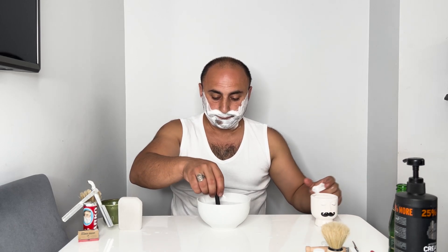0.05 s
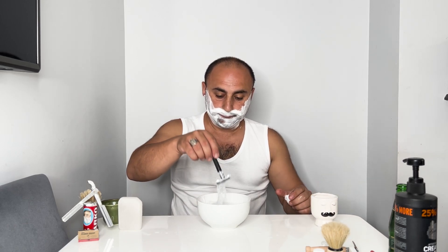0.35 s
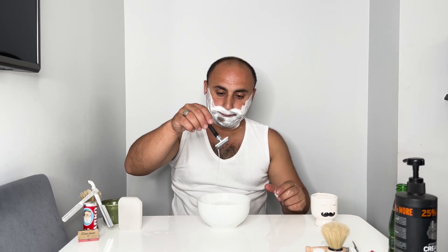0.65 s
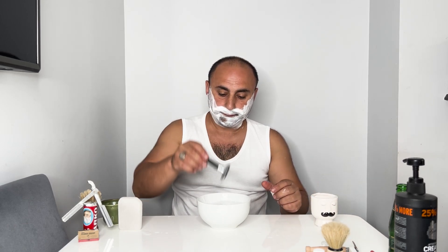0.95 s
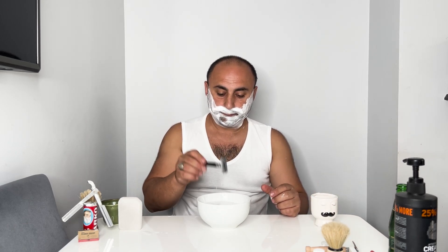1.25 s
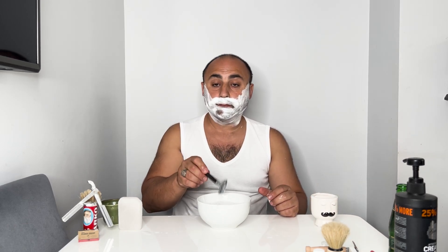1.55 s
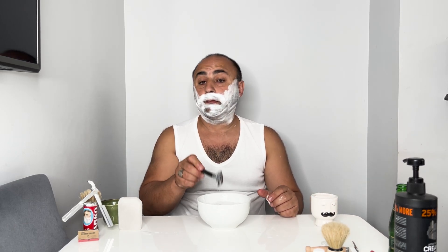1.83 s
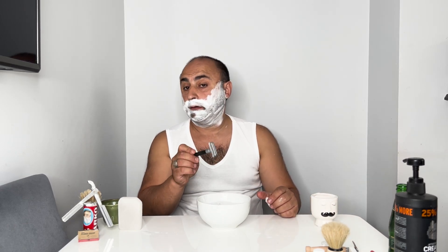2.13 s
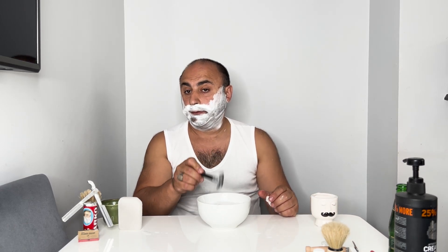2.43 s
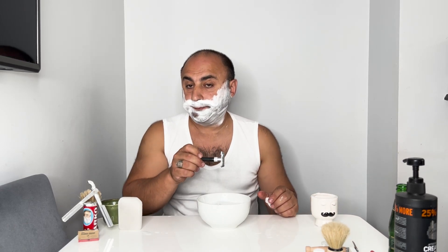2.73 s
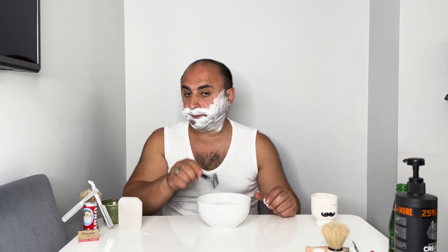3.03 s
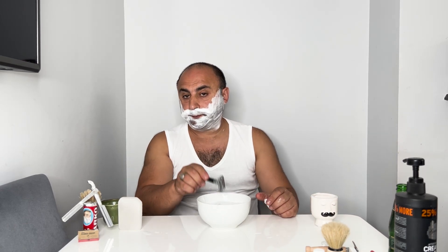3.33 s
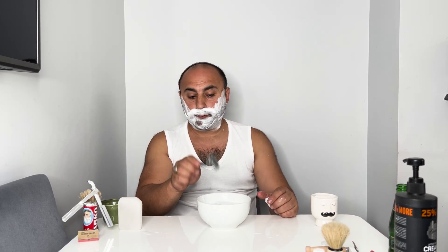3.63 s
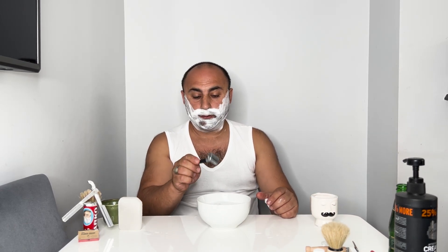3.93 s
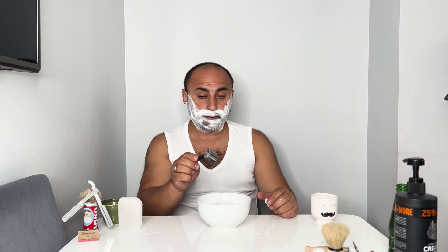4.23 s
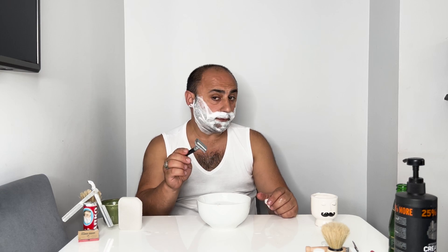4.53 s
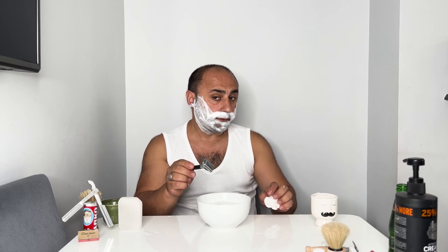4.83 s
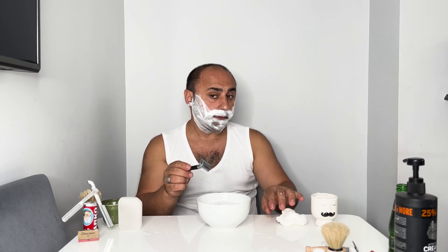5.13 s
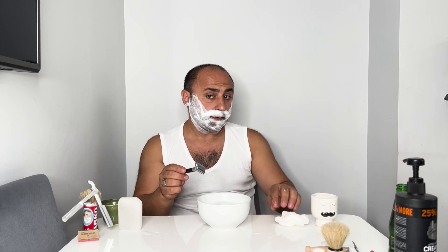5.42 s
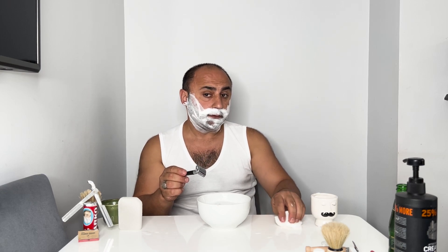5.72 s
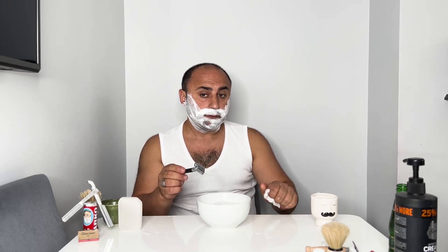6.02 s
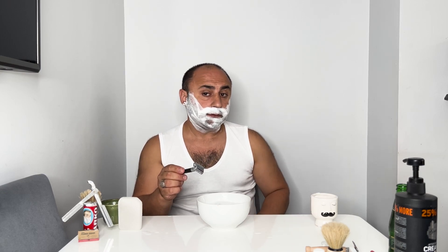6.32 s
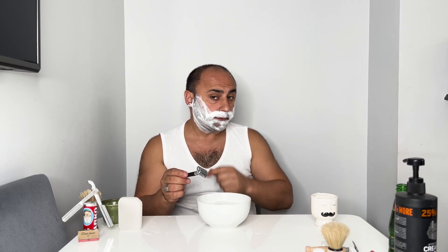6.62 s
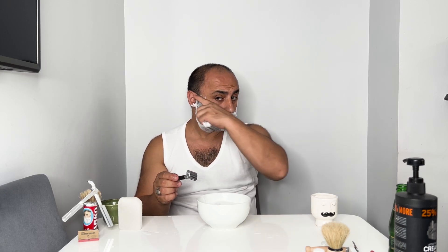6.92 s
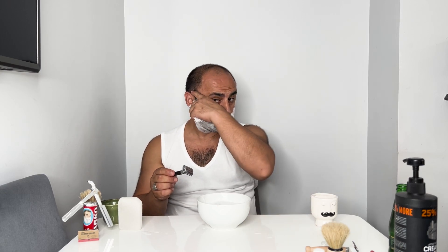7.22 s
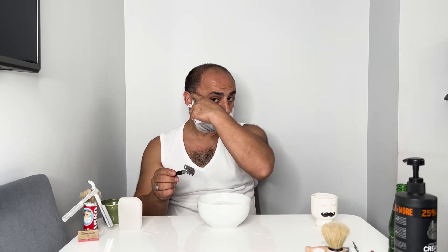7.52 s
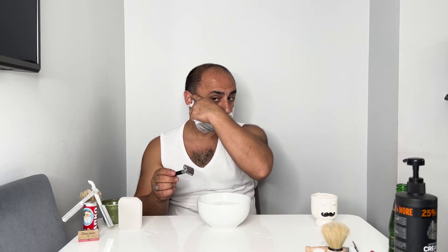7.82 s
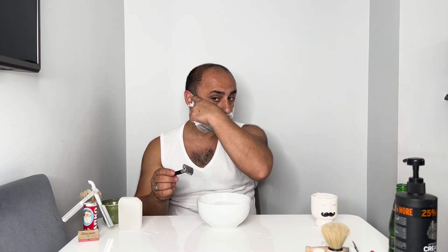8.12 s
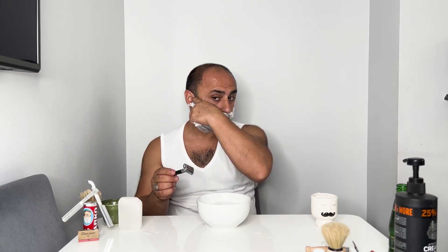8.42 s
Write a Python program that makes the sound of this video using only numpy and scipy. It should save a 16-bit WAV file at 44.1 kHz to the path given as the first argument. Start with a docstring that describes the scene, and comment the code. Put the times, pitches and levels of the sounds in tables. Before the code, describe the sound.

A few bubbly plops and a light china clink give way to thinning drips as a razor comes out of a bowl of water. Quick wet, rattling flicks follow, with deep thuds from the jolted table. After a hollow knock, quiet tissue scrapes and crinkles trail off under a faint low hum. Everything is heard from close by in a small, slightly echoing room, over steady hiss and the soft rumble of moving arms.

```python
"""Water plops as a safety razor is lifted from a china bowl in a small bare room. Each drop traps a
ringing bubble; the razor clinks on the china, dribbles and drips. It is then shaken hard, rattling and
flinging spray while the forearm jolts the table. A hand knocks the table and slides a tissue over it,
and a low hum swells and fades. Arm movements rumble softly over the room's steady hiss."""
import sys
import numpy as np
from scipy import signal
from scipy.fft import rfft, irfft, next_fast_len
from scipy.io import wavfile
from scipy.ndimage import uniform_filter1d

SR = 44100
rng = np.random.default_rng(int(sys.argv[2]) if len(sys.argv) > 2 else 0)


def wrap_up_sound(samples):
    """Save the sound to the file named by the first command line argument, as 16-bit audio."""
    columns = np.atleast_2d(samples).T
    # keep every value between -1 and 1, then stretch to whole-number steps
    tamed = np.clip(columns, -1, 1)
    steps = np.round(tamed * 32767).astype(np.int16)
    wavfile.write(sys.argv[1], SR, steps)


N = 373086

# Plops and drips in the bowl. A ring time, or t60, is how long a sound takes to fade by 60 dB.
# (time [s], level [dB], pitch [Hz], ring time [s], relative splash level [dB])
WATER_DROPS = [(0.09, -27.5, 920, 0.0041, -23), (0.094, -29, 500, 0.01, -17), (.119, -32.5, 402, 0.028, -8),
               (0.277, -49.5, 1200, 0.014, -25), (0.282, -51.5, 1780, 0.016, -38),
               (.345, -44.5, 1310, 0.0078, -10.5), (0.371, -48, 1004, 0.015, -2),
               (0.51, -56.5, 1170, 0.053, -1), (.535, -32, 840, 0.0087, -21),
               (0.54, -53.5, 1120, 0.044, -7), (0.554, -55.5, 1820, 0.033, -13),
               (0.609, -50.5, 1210, 0.055, -14), (.630, -36.5, 1170, 0.025, -6.5),
               (0.6306, -39, 1833, 0.032, -17), (.648, -43, 1904, 0.023, -0.5),
               (.655, -47.5, 1195, 0.046, -18), (0.938, -45.5, 1302, 0.054, -29),
               (0.939, -38.5, 1637, 0.015, -10), (0.989, -55, 2850, 0.0098, 5), (1.085, -55, 2400, .01, 4),
               (1.39, -56.5, 2640, 0.0085, -2.5), (1.832, -59.5, 3530, 0.012, -0.5),
               (2.056, -61.5, 3550, 0.016, 4.5), (2.174, -51, 520, 0.012, -6.5),
               (3.552, -57, 330, 0.084, 1), (3.717, -56.5, 1340, 0.029, -3)]
# Flicks of the razor: (time [s], spray level [dB], swell time [s], slap level [dB], rattle level [dB])
RAZOR_FLICKS = [(2.222, -55, 0.018, -64, -63.5), (2.387, -42.5, 0.011, -43.5, -41),
                (2.554, -57.5, 0.011, -47, -53), (2.586, -47.5, 0.013, -51, -47),
                (2.732, -46, 0.02, -46.5, -50.5), (2.842, -53.5, 0.011, -43, -52),
                (2.977, -63.5, 0.017, -50.5, -59), (2.992, -44.5, 0.029, -44.5, -51),
                (3.135, -63.5, 0.016, -60, -71), (3.237, -49.5, 0.011, -52.5, -51)]
# The tone of fizzing water and lather: (frequency [Hz], level [dB])
FIZZ_SPECTRUM = [(300, 12), (1000, -9), (2500, 2.5), (5000, -9.5), (9000, -1), (15000, -17.5)]


def amp(db):
    """Turn decibels into a factor to multiply by."""
    return 10 ** (np.asarray(db) / 20)


def unit(x):
    """Scale a sound to an average strength (rms) of 1."""
    return x / np.sqrt(np.mean(x ** 2) + 1e-20)


def along(points, hz):
    """Read a curve of (frequency [Hz], value) points at hz, on a logarithmic frequency axis."""
    frequencies, values = np.transpose(points)
    return np.interp(np.log(hz + 1), np.log(frequencies + 1), values)


def filtered(x, response):
    """Multiply each frequency in x by response(hz)."""
    length = x.shape[-1]
    padded = next_fast_len(length + 8192)
    return irfft(rfft(x, padded) * response(np.fft.rfftfreq(padded, 1 / SR)), padded)[..., :length]


def coloured(x, spectrum, peaks=()):
    """Give x a broad tone with narrow peaks on top, at strength 1."""
    lift = lambda hz: sum(db / (1 + (2 * (hz - centre) / width) ** 2) for centre, width, db in peaks)
    return unit(filtered(x, lambda hz: amp(along(spectrum, hz) + lift(hz))))


def grains(size, per_s, spread_db):
    """Tiny random impacts of uneven strength."""
    hits = rng.random(size) < per_s / SR
    return hits * rng.standard_normal(size) * amp(spread_db * rng.standard_normal(size))


def moment():
    """Half a second of sample times, for one short event."""
    return np.arange(SR // 2) / SR


def fade(t, t60):
    """A smooth dying away, 60 dB down at t60."""
    return np.exp(-np.log(1000) * t / t60)


def bell_curve(offset, width):
    """A smooth hill, highest where offset is 0."""
    return np.exp(-.5 * (offset / width) ** 2)


def held(start, length, attack_s, t60):
    """A loudness curve that rises from start, holds until length is over, then dies away."""
    t = np.arange(N) / SR - start
    return np.clip(t / attack_s, 0, 1) * fade(np.maximum(t - length, 0), t60)


def ringing(tones, t):
    """The fading tones of a struck object, added together."""
    return sum(amp(db) * np.sin(2 * np.pi * hz * t) * fade(t, t60) for hz, db, t60 in tones)


def add(track, start_s, sound):
    """Mix a stereo sound into the track."""
    start = max(round(start_s * SR), 0)
    track[:, start:start + sound.shape[1]] += sound[:, :N - start]


def in_room(x, echo_db, early_db=3, early_t60=0.48):
    """The direct sound, then on each side quick echoes from table and walls and a blurred tail."""
    # How long the room echoes: (frequency [Hz], ring time [s])
    ring_times = [(100, 0.56), (400, 0.54), (1500, 0.49), (5000, 0.6), (9000, 0.52), (15000, 0.37)]
    hz, t, bands = signal.stft(rng.standard_normal((2, SR * 5 // 8)), SR, nperseg=256)
    tail = signal.istft(bands * fade(t, along(ring_times, hz)[:, None]), SR, nperseg=256)[1]
    t = np.arange(tail.shape[1]) / SR
    tail = tail * (1 + amp(early_db) * fade(t, early_t60)) * (t > .003)
    echoes = amp(echo_db) * tail / np.linalg.norm(tail[0])
    echoes[:, 0] = 1  # the direct sound
    return signal.fftconvolve(x[None], echoes, axes=1)[:, :N]


def hiss():
    """Steady room air, its upper part a little stronger on the left."""
    # The tone of the air: (frequency [Hz], level [dB])
    air_spectrum = [(100, 2), (300, -0.5), (500, -5.5), (900, -11), (1450, -12.5), (1750, -6.5),
                    (2050, -16.5), (3500, -21), (6500, -20.5), (8800, -21), (10500, -24.5), (15500, -62)]
    # The air's balance: (frequency [Hz], left over right [dB])
    balance = [(1000, 0.53), (1700, 8), (3000, 4), (6000, 1)]
    air = amp(-76) * coloured(rng.standard_normal((2, N)), air_spectrum)
    return filtered(air, lambda hz: amp(np.outer([.5, -.5], along(balance, hz))))


def rumble(arm_lag_s=0.067, arm_half_s=0.051):
    """Each body move and each shake sways table and chair in a smooth swell, and shifts the clothes."""
    # Leaning and arm moves: (middle [s], half-length [s], sway level [dB], cloth level [dB])
    moves = [(0.128, 0.21, -60, -61), (2.04, 0.059, -58.5, -80.5), (2.683, 0.062, -56.5, -50.5),
             (3.877, 0.26, -64, -67), (4.504, .1, -62, -89), (4.84, 0.1, -56.5, -90),
             (5.34, 0.077, -53, -73), (5.81, 0.63, -61, -74), (7.088, 0.45, -58.5, -69),
             (8.153, 0.18, -65, -89)]
    # The tones of swaying furniture and shifting cloth: (frequency [Hz], level [dB])
    sway_spectrum = [(20, -20.5), (33, -8.5), (44, 10), (57, 4.5), (70, 4.5), (88, -11), (130, -12),
                     (300, -74.5)]
    cloth_spectrum = [(70, -14.5), (110, 3), (170, -2.5), (280, -12.5), (500, -21.5), (1500, -58)]
    t = np.arange(N) / SR
    follow_throughs = [(s + arm_lag_s, arm_half_s, db - 21, db - 4) for s, db, *_ in RAZOR_FLICKS]
    sway_power, cloth_power = sum(np.outer(amp(levels) ** 2, np.exp(-((t - s) / half) ** 2))
                                  for s, half, *levels in moves + follow_throughs)
    # A faint rumble stays even while sitting still.
    sway = np.sqrt(sway_power + amp(-72) ** 2) * coloured(rng.standard_normal((2, N)), sway_spectrum)
    cloth = np.sqrt(cloth_power + amp(-78.5) ** 2) * coloured(rng.standard_normal((2, N)), cloth_spectrum)
    return amp(3.5) * (sway + cloth)


def taps():
    """Small noises with no ring: hard contacts peak at once, wet ones swell for a few milliseconds."""
    # Ticks and spits of razor, lather and fingers:
    # (time [s], level [dB], centre frequency [Hz], width [octaves], swell time [s])
    contacts = [(.026, -67.5, 3000, 1.1, 0.0018), (0.072, -61, 2960, 0.57, 0.0043),
                (0.0898, -41, 3100, 0.62, 0.00079), (.095, -54, 3980, 0.3, 0.0024),
                (.116, -44, 10200, 1.1, 0.00088), (0.371, -61.5, 2400, 0.79, 0.0058),
                (.448, -61.5, 6200, 0.5, 0.0044), (0.506, -57, 8060, 0.67, 0.0071),
                (0.534, -63, 4870, 0.33, .008), (0.762, -53.5, 9860, 0.24, 0.007),
                (0.84, -60, 4000, 2.8, 0.0024), (1.887, -50.5, 2890, 0.66, 0.00059),
                (1.888, -59, 10800, 0.73, 0.00082), (3.553, -56.5, 1590, 0.38, 0.0011),
                (3.694, -61, 8050, 0.4, 0.0017), (3.812, -60, 7500, 0.2, 0.0017),
                (4.039, -65, 8060, 0.34, .002), (4.667, -61, 2600, 0.48, 0.0013),
                (4.684, -58.5, 2340, 0.37, 0.0017)]
    out, t = np.zeros((2, N)), moment()
    for s, db, centre, width, swell in contacts:
        band = lambda hz: bell_curve(np.log2((hz + 1) / centre), width)
        noise = unit(filtered(rng.standard_normal(len(t)), band))
        loudness = t / swell * np.exp(1 - t / swell)
        add(out, s, in_room(amp(db - 5) * loudness * noise, echo_db=1.5))
    return out


def drops(glide=0.15, flutter=.03, bubble_rise_s=0.00036, splash_rise_s=0.0012, splash_t60=0.036):
    """Each drop slaps the water and traps a bubble that rings briefly, wavering and rising in pitch."""
    out, t = np.zeros((2, N)), moment()
    for s, db, hz, t60, splash_db in WATER_DROPS:
        waver = unit(uniform_filter1d(rng.standard_normal(len(t)), size=90))
        pitch = hz * (1 + glide * (.5 - fade(t, t60)) + flutter * waver)
        tone = np.sin(2 * np.pi * np.cumsum(pitch) / SR)
        bubble = tone * fade(t, t60) * (1 - np.exp(-t / bubble_rise_s))
        fizz = coloured(rng.standard_normal(len(t)), FIZZ_SPECTRUM)
        splash = fizz * fade(t, splash_t60) * (1 - np.exp(-t / splash_rise_s))
        add(out, s, in_room(amp(db) * (bubble + amp(splash_db - 9) * splash), echo_db=4.5))
    return out


def table_bumps(attack_s=0.0065, bright_above_hz=195, jolt_lag_s=0.0089, thud_lag_s=0.00394):
    """Bumps, shakes and plops ring the table's low tones; a brighter blow has more of the upper ones."""
    # Arm and hand hit the table: (time [s], level [dB], brightness [dB])
    bumps = [(2.259, -33.5, -18.5), (2.858, -13, -41), (2.89, -27.5, -39), (3.05, -36, -3),
             (3.248, -35.5, -7), (3.599, -48, -2), (3.881, -44.5, -9.5), (4.68, -36.5, -26),
             (4.698, -36.5, -13), (5.331, -44.5, -11.5)]
    # The table's own tones: (pitch [Hz], level [dB], ring time [s])
    table_tones = [(58, -17.5, 0.5), (123.5, -0.5, 0.37), (144, 4.5, 0.18), (164.3, 4, 0.089),
                   (211.5, -7.5, 0.12), (278.5, -5.5, 0.1), (375, -16.5, 0.089)]
    out, t = np.zeros((2, N)), moment()
    jolts = [(s + jolt_lag_s, db + 13.5, -4) for s, db, *_ in RAZOR_FLICKS]
    # Plops thud through the bowl: bigger, lower bubbles thud harder, by 6.5 dB an octave.
    thuds = [(s + thud_lag_s, db - 8 - 6.5 * np.log2(hz / 800), 2.5) for s, db, hz, *_ in WATER_DROPS]
    for s, db, bright_db in bumps + jolts + thuds:
        tones = [(hz, level + rng.normal(0, 1) + (hz > bright_above_hz) * (bright_db + 12), t60)
                 for hz, level, t60 in table_tones]
        ring = ringing(tones, t) * (1 - np.exp(-(t / attack_s) ** 2))
        add(out, s, in_room(amp(db - 4) * ring / np.abs(ring).max(), echo_db=-5.5))
    return out


def clink(start_s=.1165):
    """The razor's head touches the china, whose ring the water cuts short."""
    # The bowl's own tones: (pitch [Hz], level [dB], ring time [s])
    china_tones = [(1130, 2, 0.17), (1840, -12, 0.2), (3200, -12, 0.18), (5160, -13, 0.11),
                   (7060, -22, 0.19), (8450, -15, 0.12), (8960, 3, 0.1), (10800, 12, 0.052),
                   (11960, -10.5, 0.12), (12300, -9, 0.15), (12200, -9, 0.08), (13650, -14, 0.12),
                   (15800, 3, 0.086)]
    out = np.zeros((2, N))
    add(out, start_s, in_room(amp(-54) * ringing(china_tones, moment()), echo_db=-5))
    return out


def dribble(start_s=.35, bubbles_per_s=230, gushes_per_s=9.2, ring_cycles=24):
    """Lathery water runs off the razor, crackling; its bubbles get smaller and higher as it thins."""
    count = 400
    timing, detune, strength = rng.random((count, 3)).T
    delays = (np.arange(count) + timing) / bubbles_per_s
    pitch = np.minimum(1616 * 2 ** (7.05 * delays), 5700)  # climbs 7.05 octaves a second, then levels off
    hz = pitch * np.exp(0.184 * (2 * detune - 1))
    t = moment()[:1024]
    rings = strength[:, None] * np.sin(2 * np.pi * np.outer(hz, t)) * fade(t, ring_cycles / hz[:, None])
    places = ((start_s + delays[:, None]) * SR).astype(int) + np.arange(len(t))
    bubbles = np.bincount(places.ravel(), rings.ravel(), N)[:N]  # add each ring in at its place
    bubbles = bubbles / bubbles[places.min():places.max()].std()
    fizz = amp(-6) * coloured(grains(N, per_s=1000, spread_db=0), FIZZ_SPECTRUM)
    flow = held(start_s, length=0.17, attack_s=0.019, t60=1.94)
    gush_db = np.sin(2 * np.pi * gushes_per_s * (np.arange(N) / SR - start_s))
    return in_room(amp(-73 + gush_db) * flow * (bubbles + fizz), echo_db=1.5)


def shakes():
    """Each flick rattles the razor's head and throws a dull slap and a swelling burst of droplets."""
    # Where the razor rings: (frequency [Hz], width [Hz], boost [dB])
    razor_peaks = [(825, 37, 5), (1058, 36, 6.5), (1297, 72, 6), (2385, 17, -9), (3000, 160, 0),
                   (3320, 76, 1), (4670, 17, 7), (5180, 200, 3), (5660, 230, 6), (6760, 50, -1)]
    # The tones of the spray, the slap and the rattling head: (frequency [Hz], level [dB])
    spray_spectrum = [(200, -10), (600, 5.5), (1200, 0.5), (1900, 0), (3000, 2.5), (4500, -6), (7500, -3),
                      (9500, -4), (11500, -13), (15500, -21.5)]
    slap_spectrum = [(90, -34), (170, 6.5), (260, 4), (450, 6), (650, -4), (850, -5), (1100, -9),
                     (2000, -13), (5000, -36), (15000, -51)]
    rattle_spectrum = [(500, -52), (1000, -9.5), (1250, 11), (1450, 0.5), (1800, -22), (2600, 0),
                       (4000, -74), (8000, -63)]
    out, t = np.zeros((2, N)), moment()
    hump = lambda peak_s: (t / peak_s * np.exp(1 - t / peak_s)) ** 3
    for s, spray_db, swell, slap_db, rattle_db in RAZOR_FLICKS:
        spray = coloured(grains(len(t), per_s=14000, spread_db=1.5), spray_spectrum, razor_peaks)
        slap = coloured(rng.standard_normal(len(t)), slap_spectrum, razor_peaks)
        rattle = coloured(grains(len(t), per_s=2500, spread_db=2.5), rattle_spectrum, razor_peaks)
        water = amp(spray_db) * spray + amp(slap_db) * slap
        add(out, s, in_room(amp(-2.5) * hump(swell) * water, echo_db=7))
        add(out, s, in_room(amp(rattle_db) * hump(0.95 * swell) * rattle, echo_db=-1))  # peaks just ahead
    return out


def rubbing():
    """Skin brushes the table; the tissue scrapes and crinkles in fine grains."""
    # Brushes of skin: (start [s], length [s], level [dB])
    brushes = [(3.56, 0.24, -62), (3.864, 0.1, -68.5), (3.968, 0.21, -72.5), (4.66, .025, -54)]
    # Strokes of the tissue: (start [s], length [s], scrape level [dB], crinkle level [dB])
    strokes = [(3.567, 0.22, -82.5, -76.5), (3.83, 0.056, -72, -73.5), (4.113, 0.081, -79, -78),
               (4.651, 0.026, -70, -65.5), (4.728, 0.037, -75, -78.5), (4.863, 0.077, -77, -91),
               (5.007, 0.06, -80.5, -89), (5.233, .04, -75, -79), (5.331, 0.058, -76, -84),
               (5.607, .04, -78.5, -92), (5.696, .04, -75.5, -83), (5.78, .2, -76, -86.5),
               (5.961, 0.044, -74.5, -73.5), (6.066, 0.021, -85, -78), (6.355, 0.041, -86, -66.5),
               (6.605, 0.063, -79.5, -92)]
    # The tones of skin, scraping paper and crinkling paper: (frequency [Hz], level [dB])
    skin_spectrum = [(120, 0), (280, -1), (500, -9.5), (1000, -12.5), (1600, -15), (4000, -41)]
    scrape_spectrum = [(600, -13.5), (1400, 4), (2200, 1.5), (4000, -7), (7000, -15), (12000, -31)]
    crinkle_spectrum = [(2500, -5), (6500, -0.5), (9500, 5.5), (11500, 0), (15500, -11)]
    stroke = lambda s, length: held(s, length, attack_s=0.016, t60=0.15)
    brushing = sum(amp(db) * stroke(s, length) for s, length, db in brushes)
    scraping, crinkling = sum(np.outer(amp(levels), stroke(s, length)) for s, length, *levels in strokes)
    skin = brushing * coloured(rng.standard_normal(N), skin_spectrum)
    scrape = scraping * coloured(grains(N, per_s=610, spread_db=0.5), scrape_spectrum)
    crinkle = crinkling * coloured(grains(N, per_s=1100, spread_db=2.5), crinkle_spectrum)
    return in_room(amp(-4) * (skin + scrape + crinkle), echo_db=2.5)


def knuckle(start_s=4.667, attack_s=0.0024):
    """A knuckle knocks hollowly as the hand shifts on the table."""
    # The tones of the knock: (pitch [Hz], level [dB], ring time [s])
    hollow_tones = [(1143, 7, 0.02), (1774, -15, 0.069), (286.8, -7, 0.24)]
    out, t = np.zeros((2, N)), moment()
    knock = ringing(hollow_tones, t) * (1 - np.exp(-t / attack_s))
    add(out, start_s, in_room(amp(-45) * knock, echo_db=-5))
    return out


def hum(pitch_hz=68.8, width_hz=7.7, peak_s=6.62, width_s=1):
    """A narrow band of noise makes a low, wavering hum that swells and fades under the last movements."""
    band = filtered(rng.standard_normal(N), lambda hz: bell_curve(hz - pitch_hz, width_hz))
    return amp(-62) * bell_curve(np.arange(N) / SR - peak_s, width_s) * unit(band)


def scene():
    """All sounds around the table, over the room's air."""
    return (hiss() + rumble() + taps() + drops() + table_bumps() + clink() + dribble() + shakes()
            + rubbing() + knuckle() + hum())


def record(dry, cutoff_hz=15800):
    """Bass and top treble are nearly mono, with the treble out of step between left and right."""
    # The stereo image:
    # (frequency [Hz], stereo width [dB], left lead [half cycles], left over right [dB])
    stereo_image = [(150, -19, 0, .9), (330, -9, 0, .8), (600, 0, 0, 0), (2200, 1, 0, 0), (4000, 2, -.1, 5),
                    (5700, 0, 0, 8), (7500, -4, .2, 4), (8700, -10, .55, 1), (9900, -30, .95, 0),
                    (10900, -30, 1.08, 0), (11700, -20, 1.45, 0), (12700, -25, 2, 0), (15500, -12, 2.1, 0)]
    curve = lambda column, hz: along(np.array(stereo_image)[:, [0, column]], hz)
    middle = (dry[0] + dry[1]) / 2
    side = filtered((dry[0] - dry[1]) / 2, lambda hz: amp(curve(1, hz)))
    split = np.array([[.5], [-.5]])  # left goes half one way, right half the other
    balance = lambda hz: amp(split * curve(3, hz))
    lead = lambda hz: np.exp(1j * np.pi * split * curve(2, hz))
    stereo = filtered(np.array([middle + side, middle - side]), lambda hz: balance(hz) * lead(hz))
    return filtered(stereo, lambda hz: 1 / (1 + (hz / cutoff_hz) ** 160))  # cut off the highest treble


dry = scene()
out = record(dry)
wrap_up_sound(out)
```